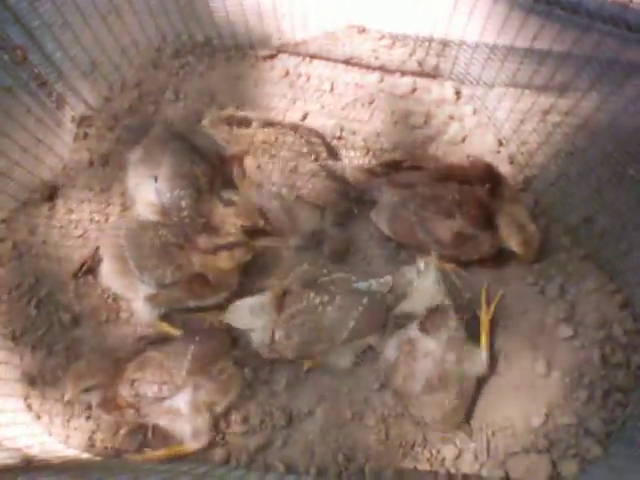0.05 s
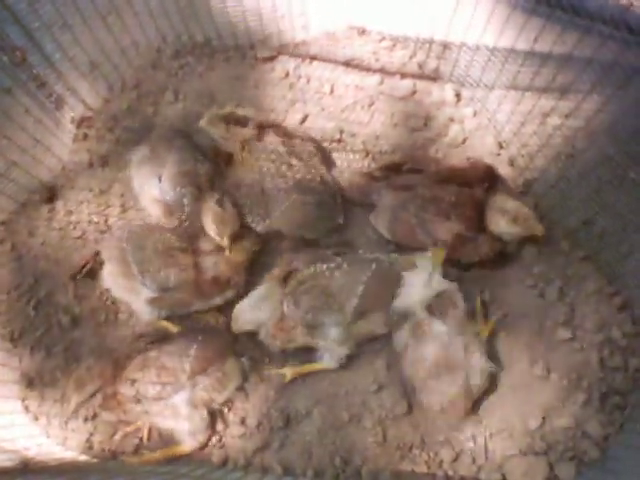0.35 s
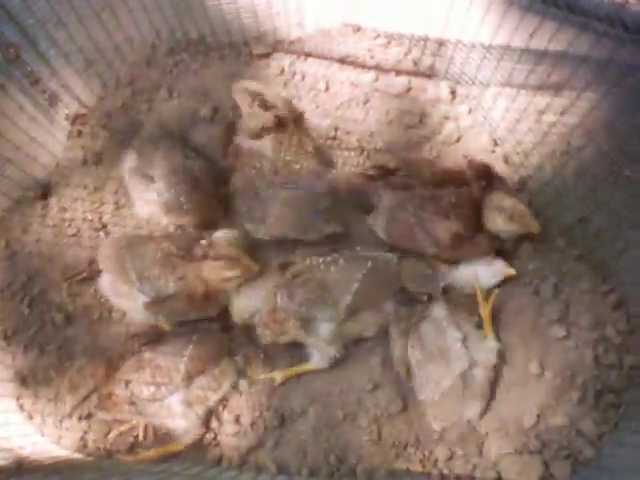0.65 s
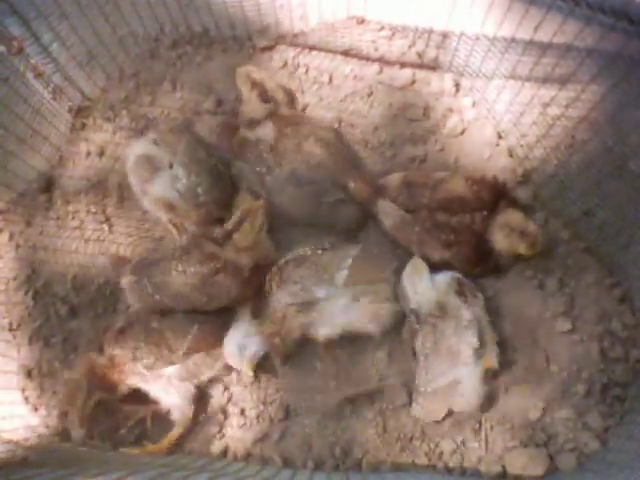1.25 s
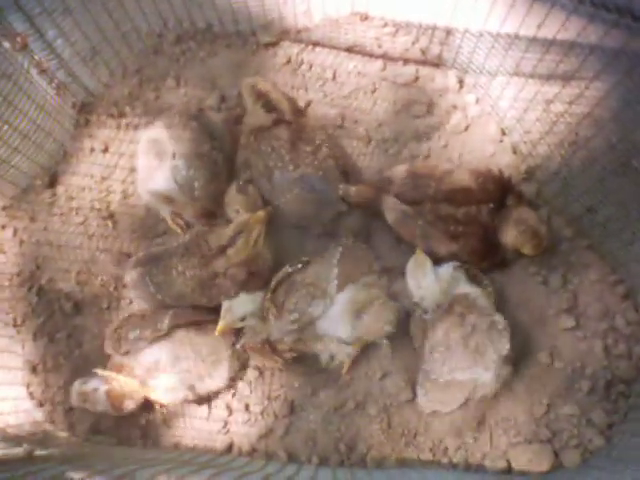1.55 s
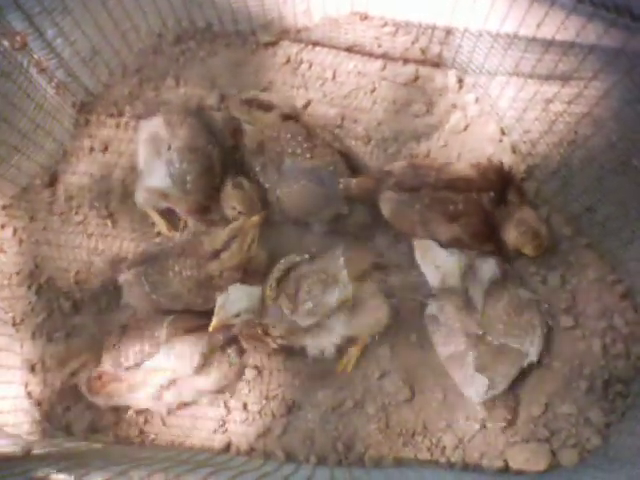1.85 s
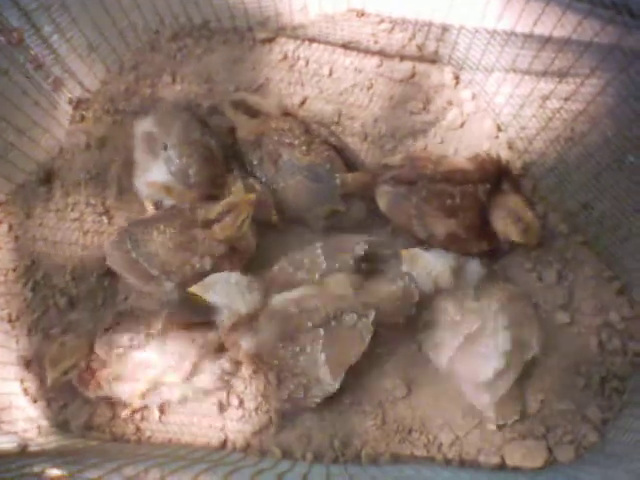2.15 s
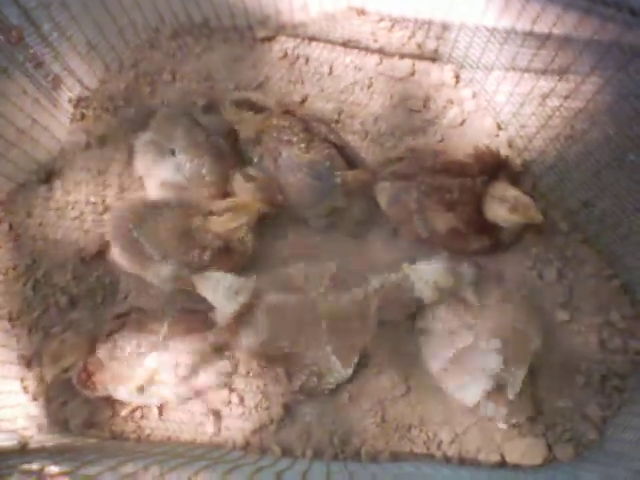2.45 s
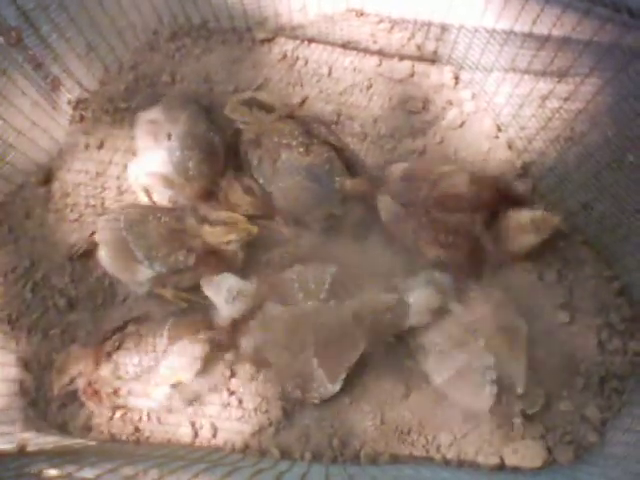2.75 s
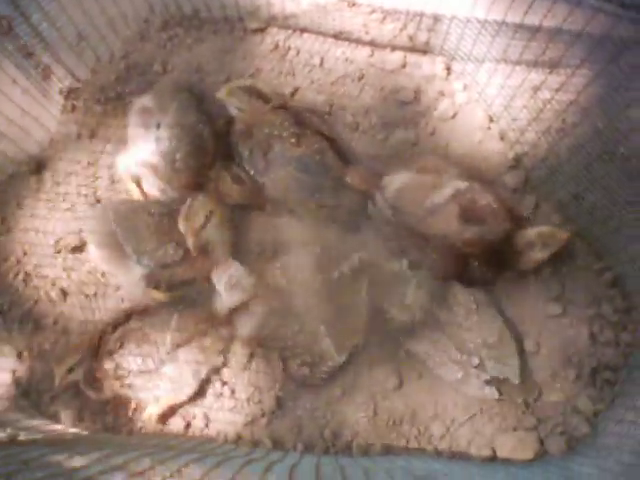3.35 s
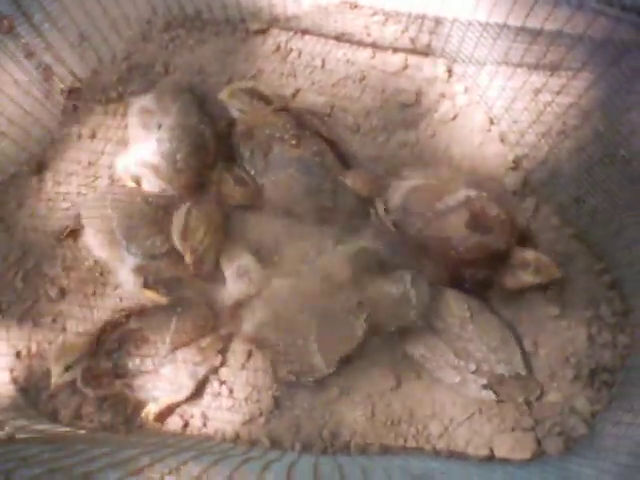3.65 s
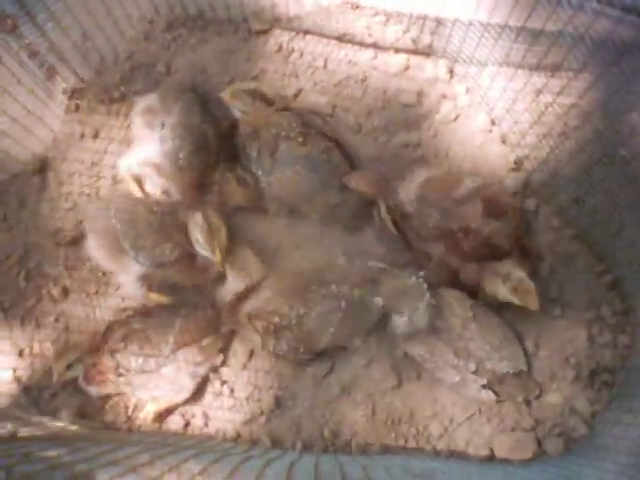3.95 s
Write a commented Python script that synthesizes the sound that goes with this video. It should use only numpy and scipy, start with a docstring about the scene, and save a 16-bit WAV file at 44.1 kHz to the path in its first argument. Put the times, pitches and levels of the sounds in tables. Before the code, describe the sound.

Chicks dust-bathe in dry dirt, close to a dull, hissy microphone over a low rumble. Soft wing flicks come up to six a second, strongest around 1 second, with foot taps, scrapes and three faint peeps early on. From 2.3 seconds bodies shuffle through the dust, a foot knocks hard, flung crumbs tick and one thin peep sounds. The flicks return from 3 to 4 seconds.

```python
"""Chicks dust-bathing in a woven tub of dry dirt, close to a small, dull, hissy microphone.
Feet knock and scrape as one chick flicks its wings, up to about six times a second, among faint peeps.
Just past halfway two shuffle their bodies through the dust, a foot lands hard and flung crumbs tick;
one more thin peep, and the flicks return for the last second. The brood stirs over a low rumble."""
import sys
import numpy as np
from scipy.fft import rfft, irfft, next_fast_len
from scipy.io import wavfile
from scipy.ndimage import uniform_filter1d, map_coordinates

SR = 44100
rng = np.random.default_rng(int(sys.argv[2]) if len(sys.argv) > 2 else 0)


def transcribe(u):
    """Save the signal u as a 16-bit wav file named by the first command-line argument.

    u: samples, shape (n,) or (channels, n), limited to [-1, 1]; the rate is SR.
    q: integer samples, one column per channel.
    """
    v = np.clip(np.atleast_2d(u).T, -1, 1)
    q = np.round(v * 32767).astype(np.int16)
    wavfile.write(sys.argv[1], SR, q)


N = 176400


def amp(db):
    return 10 ** (np.asarray(db) / 20)


def unit(x):
    return x / np.sqrt(np.mean(x ** 2) + 1e-20)


def clock():
    return np.arange(N) / SR


def filtered(x, response):
    """x through a gain given as a function of frequency in Hz."""
    size = next_fast_len(len(x) + 8192)
    return irfft(rfft(x, size) * response(np.fft.rfftfreq(size, 1 / SR)), size)[:len(x)]


def coloured(x, points):
    """x shaped by a spectrum of (freq_hz, gain_db) points, at rms 1."""
    freq_hz, gain_db = np.transpose(points)
    return unit(filtered(x, lambda hz: amp(np.interp(np.log(hz + 1), np.log(freq_hz), gain_db))))


def resonate(x, peaks):
    """x through parallel resonances of alternating polarity."""
    return filtered(x, lambda hz: sum(
        (-1) ** k * amp(db) * 1j * hz * width / (centre ** 2 - hz ** 2 + 1j * hz * width)
        for k, (centre, width, db) in enumerate(peaks)))


def wobble(knots_per_s):
    """A smooth random curve."""
    knots = rng.standard_normal(int(N * knots_per_s / SR) + 4)
    return map_coordinates(knots, [clock() * knots_per_s])


def swell(t, rise_s, fall_s):
    """A bell around t = 0 with its own rise and fall."""
    return np.exp(-(t / np.where(t < 0, rise_s, fall_s)) ** 2)


def add(out, x, start_s):
    i = max(round(start_s * SR), 0)
    out[i:i + len(x)] += x[:max(len(out) - i, 0)]


def grains(per_s=1700):
    """Specks of dirt slipping at random moments."""
    return (rng.random(N) < per_s / SR) * rng.standard_normal(N)


def rubbing(strokes, colour):
    """Dense grains of dirt under a swell for each stroke."""
    t = clock()
    power = sum((amp(db) * swell(t - peak_s, rise, fall)) ** 2 for peak_s, db, rise, fall in strokes)
    return np.sqrt(power) * coloured(grains(), colour)


def impacts(hits, modes, scatter_db=2.5, detune=0.04, attack_s=0.002):
    """Each hit rings a few heavily damped modes, a little differently every time."""
    out, t = np.zeros(N), np.arange(SR // 10) / SR
    for start_s, peak_db in hits:
        ring = np.zeros(len(t))
        for hz, db, t60_s in modes:
            decay = amp(db + rng.normal(0, scatter_db) - 60 * t / t60_s)
            ring += decay * np.sin(2 * np.pi * hz * rng.normal(1, detune) * t)
        ring *= 1 - np.exp(-t / attack_s)
        add(out, -amp(peak_db) * ring / np.abs(ring).max(), start_s)
    return out


def wing_flicks():
    """Feathers zip past each other in a slowing train of slips: a rasp, a ringing quill, a hollow flap."""
    # wing strokes: peak_s, rasp_db, quill_db, quill_hz, flap_db, slip_hz, half_length_s
    flicks = [(0.125, -51, -52, 1297, -53, 595, 0.0084), (0.261, -52.5, -53.5, 1357, -55.5, 621, 0.013),
              (0.735, -42, -51, 1210, -47.5, 631, 0.0097), (0.8824, -40.5, -45.5, 950, -41, 584, 0.0072),
              (1.037, -42.5, -37, 1270, -45.5, 500, 0.0069), (1.196, -45.5, -46, 1380, -38.5, 606, 0.0083),
              (1.36, -49, -54, 1405, -42.5, 528, 0.0083), (1.807, -56.5, -58.5, 780, -58, 650, 0.01),
              (1.949, -48, -45, 751, -49, 702, 0.0044), (2.099, -45.5, -49.5, 1985, -52.5, 629, 0.006),
              (2.244, -47, -52, 863, -48.5, 703, 0.0097), (3.074, -53, -45.5, 1080, -60, 703, 0.007),
              (3.222, -46, -46, 761, -52, 474, 0.0075), (3.374, -51, -41, 1295, -48, 658, 0.0059),
              (3.467, -51.5, -55, 908, -60, 476, 0.01), (3.534, -49.5, -46.5, 1180, -59, 600, 0.0047),
              (3.736, -50.2, -51.5, 1244, -56, 580, 0.0084), (3.973, -44.5, -41.5, 1324, -49, 700, 0.005)]
    # resonances of the tub that colour the rasp: centre_hz, width_hz, gain_db
    rasp_peaks = [(920, 330, -1.5), (1332, 190, 0.5), (1765, 284, -2), (2096, 260, -4), (3000, 400, -14.5)]
    # resonances of the flapping wing: centre_hz, width_hz, gain_db
    flap_peaks = [(395, 118, 0), (617, 147, 0)]
    slip_sag, quill_sag = 0.07, 0.02525  # fractional fall in frequency per half length
    slip_scatter, tone_waver = 0.14, 0.046
    air_share, puff_db, flap_lag_s = 0.36, -1, 0.0023
    steepness, brush_db, muffle_hz = 2.9, -12, 2650
    out, t = np.zeros(N), np.arange(-SR // 20, SR // 20) / SR
    for peak_s, rasp_db, quill_db, quill_hz, flap_db, slip_hz, half_s in flicks:
        air, jitter = rng.standard_normal((2, len(t)))
        uneven = unit(uniform_filter1d(jitter, size=90))
        progress = np.clip(t / half_s, -2, 2)

        def cycles(hz, sag, waver):
            return np.cumsum(hz * np.exp(-sag * progress + waver * uneven)) / SR

        slips = np.diff(np.floor(cycles(slip_hz, slip_sag, slip_scatter)), prepend=0)  # one per cycle
        drive = np.sqrt(1 - air_share) * unit(slips - slips.mean()) + np.sqrt(air_share) * air
        rasp = resonate(drive, rasp_peaks)
        quill = np.sin(2 * np.pi * cycles(quill_hz, quill_sag, tone_waver))
        flap = unit(np.sin(2 * np.pi * cycles(slip_hz, slip_sag, tone_waver)))
        flap += amp(puff_db) * unit(resonate(drive, flap_peaks))
        brushing = amp(brush_db) * swell(t, 2 * half_s, 2 * half_s)  # soft skirt around the core
        for sound, db, lag_s in [(rasp, rasp_db, 0), (quill, quill_db, 0), (flap, flap_db, flap_lag_s)]:
            core = np.exp(-np.abs((t - lag_s) / half_s) ** steepness)
            shape = np.maximum(core, brushing)
            shape_rms = np.sqrt(np.mean(shape ** 2))
            add(out, amp(db) * shape_rms * unit(shape * sound), peak_s + t[0])
    # soft feathers carry little treble
    return filtered(out, lambda hz: 1 / np.sqrt(1 + (hz / muffle_hz) ** 4))


def body_shuffles():
    """Bodies rub through the dry dust in quick strokes."""
    # body strokes: peak_s, level_db, rise_s, fall_s
    shuffles = [(2.321, -47, 0.037, 0.009), (2.373, -51, 0.034, 0.01), (2.397, -48.5, 0.012, 0.012),
                (2.482, -51, 0.029, 0.016), (2.557, -50.5, 0.04, 0.024), (2.643, -49.5, 0.033, 0.01),
                (2.69, -49, 0.021, 0.0057), (2.734, -49, 0.018, 0.012), (2.796, -51, 0.042, 0.018),
                (2.884, -47.5, 0.014, 0.022), (2.968, -48, 0.019, 0.016), (3.02, -47.5, 0.019, 0.011),
                (3.065, -48, 0.021, 0.022), (3.135, -47, 0.015, 0.011), (3.205, -47, 0.023, 0.022),
                (3.305, -49, 0.027, 0.0094), (3.36, -44.5, 0.026, 0.024), (3.455, -53, 0.023, 0.018),
                (3.523, -51, 0.033, 0.032), (3.648, -53, 0.025, 0.02), (3.725, -53.5, 0.042, 0.034),
                (3.861, -54, 0.025, 0.015), (3.955, -54, 0.027, 0.015)]
    # spectrum of rubbed dust: freq_hz, gain_db
    dust = [(120, -45), (280, -5), (410, -1.5), (560, -3.5), (790, 6), (1100, 2), (1300, -0.5),
            (1520, -14.5), (1800, -2), (2050, -9.5), (2500, -18), (4200, -23), (9000, -62)]
    return rubbing(shuffles, dust)


def foot_knocks():
    """Feet strike the ground under the tub, which gives a short, dull ring."""
    # footfalls: start_s, peak_db
    knocks = [(.080, -37), (.092, -40), (0.214, -44), (.354, -42.5), (1.073, -49), (2.3545, -24),
              (2.363, -35.5), (2.7215, -39), (2.9358, -33)]
    # modes of the ground: pitch_hz, level_db, t60_s
    ground = [(436, -11.5, 0.033), (555, -0.5, 0.016), (1210, -11, .014), (1900, -19, 0.026)]
    return impacts(knocks, ground)


def foot_scrapes():
    """Feet drag over the dirt with a low, grainy scuff."""
    # foot strokes: peak_s, level_db, rise_s, fall_s
    scrapes = [(.138, -57, 0.012, 0.011), (.44, -50.5, 0.012, 0.014), (.587, -48, 0.057, 0.022),
               (.752, -52, 0.006, 0.037), (.88, -56, 0.083, 0.08), (1.10, -51.5, 0.12, 0.063),
               (1.225, -54, 0.043, 0.027), (1.436, -48.5, 0.0062, .012)]
    # spectrum of scraped ground: freq_hz, gain_db
    scuff = [(150, -47), (300, -4.5), (400, 0), (560, -1), (780, -14.5), (1000, -27), (1300, -9),
             (1550, -20), (1850, -15), (2600, -38), (6000, -56)]
    return rubbing(scrapes, scuff)


def flung_crumbs():
    """Flung crumbs of soil land with dry ticks."""
    # landings: start_s, peak_db
    landings = [(2.478, -36), (2.691, -39), (2.722, -37), (2.793, -42), (2.846, -41.5), (2.885, -42),
                (3.016, -40.5), (3.176, -37)]
    # modes a landing crumb rings: pitch_hz, level_db, t60_s
    modes = [(860, 3.5, 0.012), (1120, -5, 0.017), (1930, -17.5, 0.013)]
    return impacts(landings, modes)


def peeps(bend=0.83, waver=0.014, flutter_db=2.5):
    """The chicks' thin whistles glide, unsteady in pitch and strength."""
    # calls: start_s, length_s, start_hz, end_hz, level_db
    calls = [(0.165, 0.028, 3850, 3240, -59.5), (0.197, .023, 3300, 2820, -56.5),
             (0.643, 0.044, 3320, 2950, -59.5), (2.522, 0.0174, 6960, 7700, -58)]
    out = np.zeros(N)
    for start_s, length_s, start_hz, end_hz, db in calls:
        n = int(length_s * SR)
        progress = np.linspace(0, 1, n)
        glide_hz = start_hz + (end_hz - start_hz) * progress ** bend
        pitch_hz = glide_hz * (1 + waver * wobble(190)[:n])
        level = amp(db + flutter_db * wobble(210)[:n])
        arch = np.sqrt(2 * np.abs(np.sin(np.pi * progress)))
        add(out, level * arch * np.sin(2 * np.pi * np.cumsum(pitch_hz) / SR), start_s)
    return out


def brood_stirring(level_db=-59.5, uneven_db=-2.0):
    """The other chicks never keep quite still: a faint, grainy rustle."""
    # spectrum of the rustle: freq_hz, gain_db
    rustle = [(120, -11.5), (250, -5), (480, -4), (800, -8.5), (1250, -8.5), (1550, -15.5), (1900, -9.5),
              (2800, -22.5), (6000, -49)]
    return amp(level_db + uneven_db * wobble(22.47)) * coloured(grains(), rustle)


def low_rumble(base_db=-47):
    """A low rumble behind the birds rises and sinks a little."""
    # spectrum of the rumble: freq_hz, gain_db
    colour = [(5, -10), (14, 10), (28, 1), (75, -5), (110, -11.5), (170, -19), (260, -29.5), (2000, -101)]
    # its slow drift about the base level: time_s, offset_db
    drift = [(.9, 1.5), (1.4, -2.5), (2.7, 1), (4, -1)]
    level = amp(base_db + np.interp(clock(), *np.transpose(drift)))
    return level * coloured(rng.standard_normal(N), colour)


def microphone_noise(hiss_db=-57.5):
    """The small microphone's own even hiss and thin electrical whine."""
    # spectrum of the hiss: freq_hz, gain_db
    colour = [(100, 4.5), (1500, 1.1), (6000, 1.5), (9500, 1.5), (10500, -1.5), (11300, -11), (12000, -23)]
    # steady tones of the whine: pitch_hz, level_db
    tones = [(4800, -84), (5600, -84), (6100, -79), (6200, -78), (7000, -91), (7400, -95), (10526, -78.5),
             (11524, -87.5)]
    t = clock()
    whine = sum(amp(db) * np.sqrt(2) * np.sin(2 * np.pi * (hz * t + rng.random())) for hz, db in tones)
    return whine + amp(hiss_db) * coloured(rng.standard_normal(N), colour)


def scene():
    """All the chicks in mono, at one microphone close to the tub."""
    dirt = body_shuffles() + foot_scrapes() + brood_stirring()
    chicks = wing_flicks() + dirt + foot_knocks() + flung_crumbs() + peeps()
    return (chicks + low_rumble() + microphone_noise())[None]


def record(dry):
    """The recorder sits slightly off zero and keeps nothing above its band limit."""
    dc_offset, top_hz = -0.0192, 12240
    return dc_offset + filtered(dry[0], lambda hz: hz < top_hz)[None]


dry = scene()
out = record(dry)
transcribe(out)
```